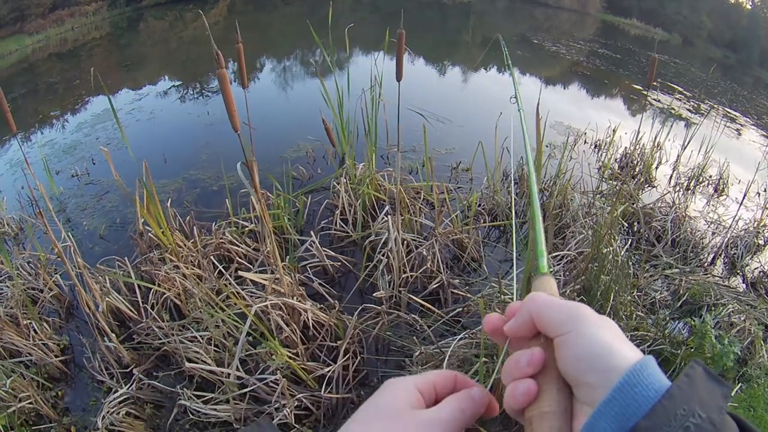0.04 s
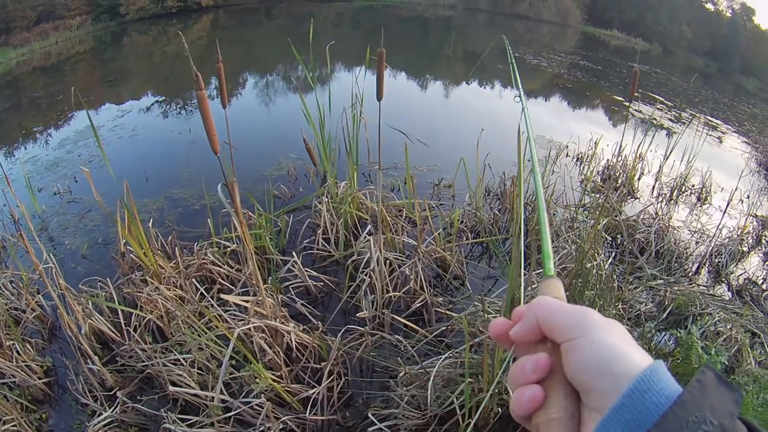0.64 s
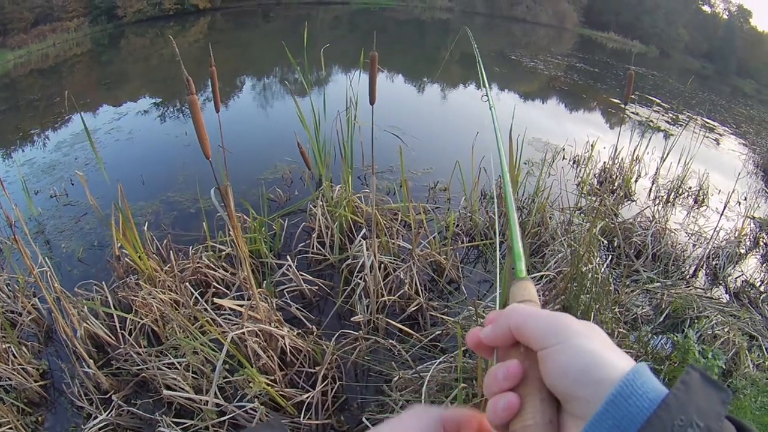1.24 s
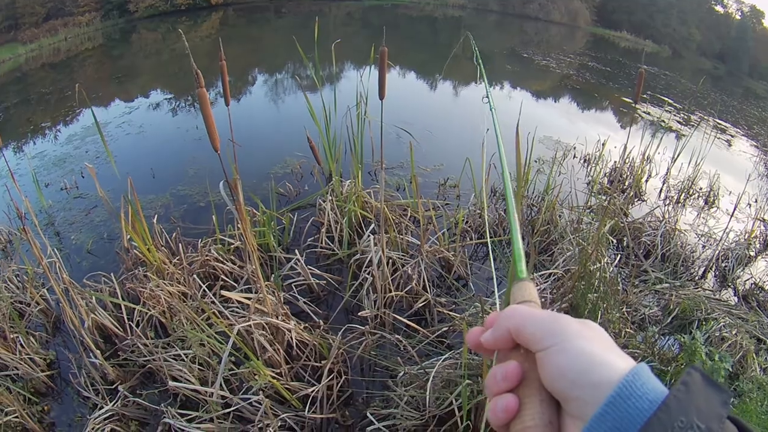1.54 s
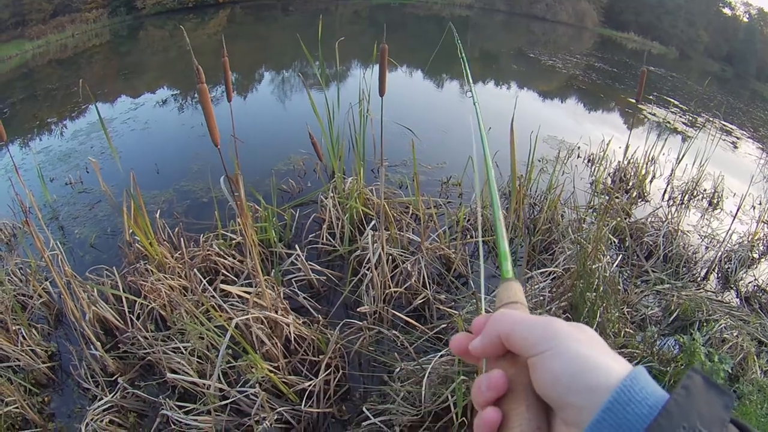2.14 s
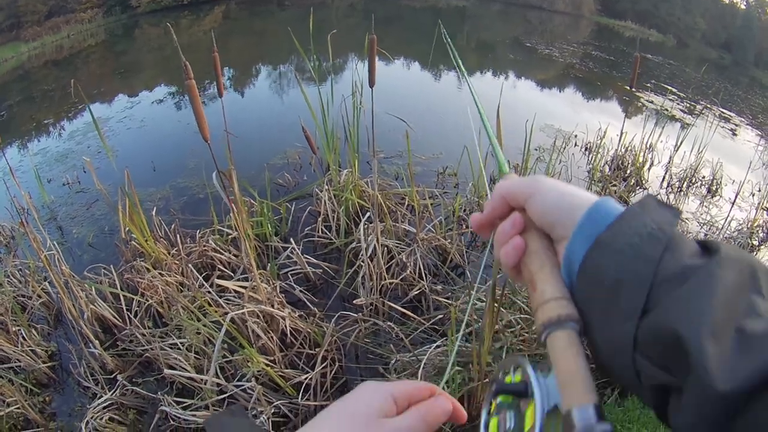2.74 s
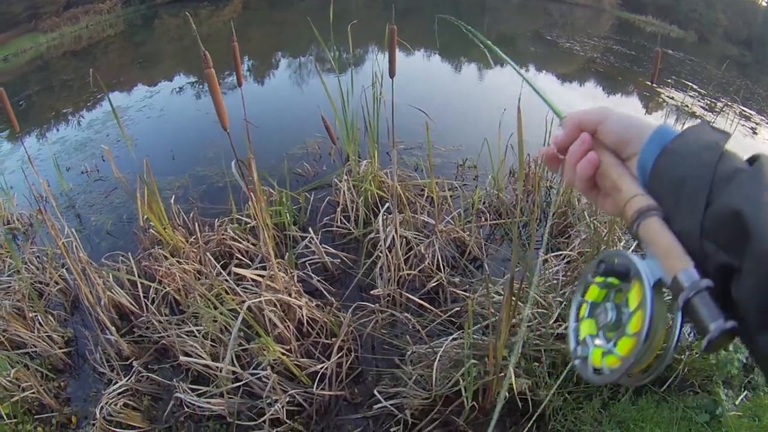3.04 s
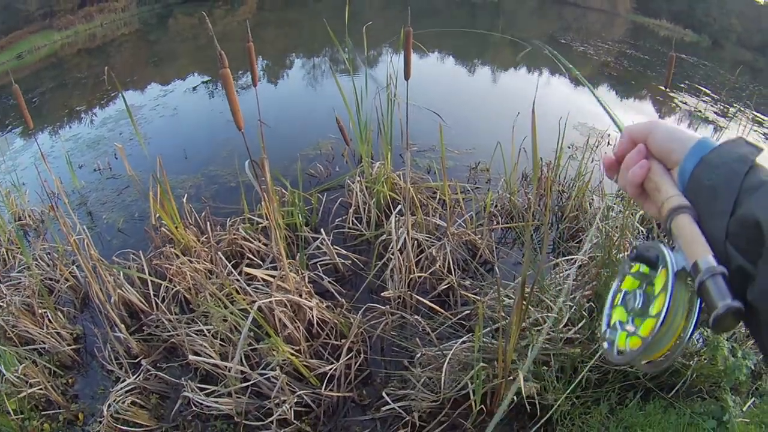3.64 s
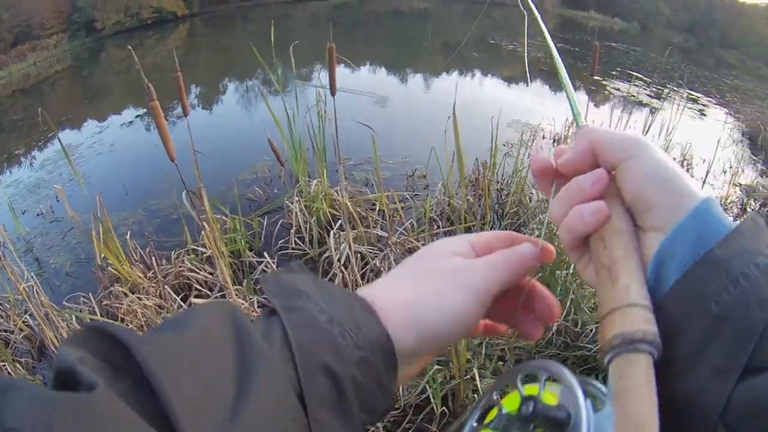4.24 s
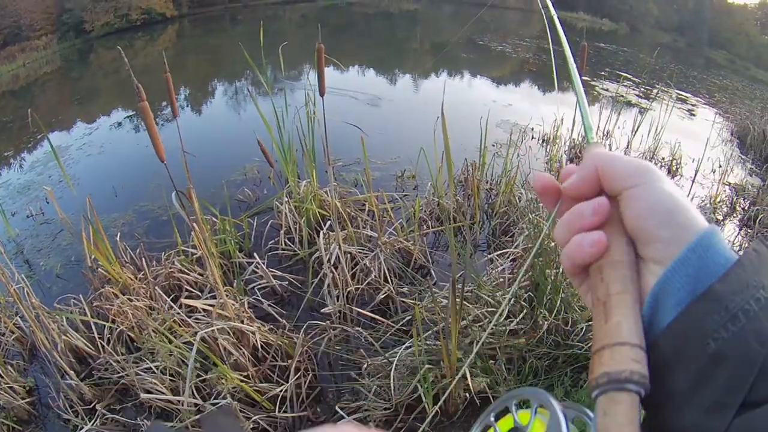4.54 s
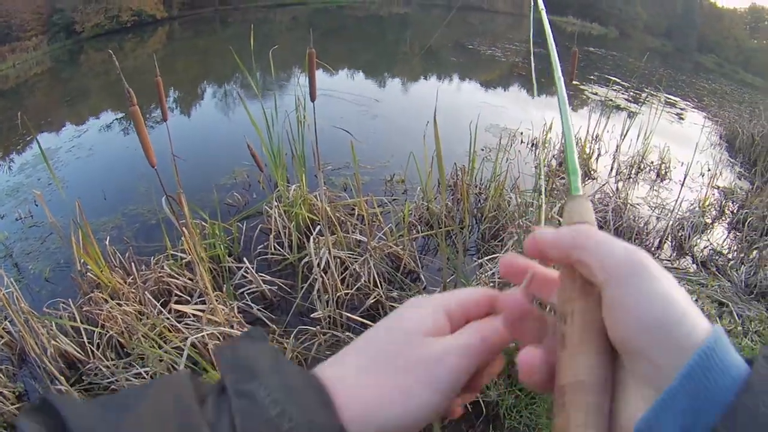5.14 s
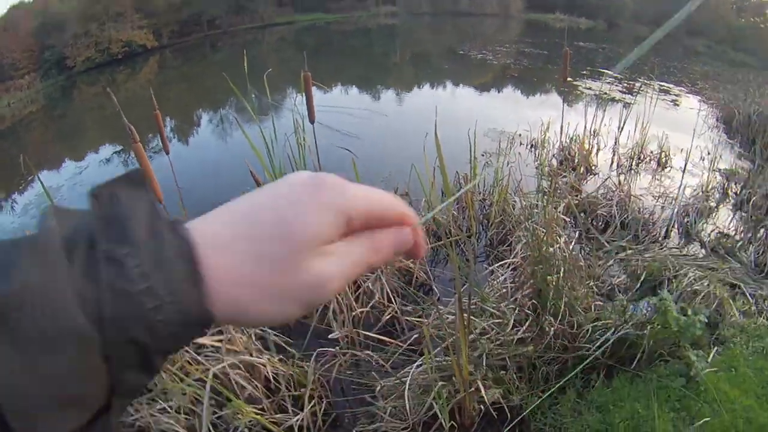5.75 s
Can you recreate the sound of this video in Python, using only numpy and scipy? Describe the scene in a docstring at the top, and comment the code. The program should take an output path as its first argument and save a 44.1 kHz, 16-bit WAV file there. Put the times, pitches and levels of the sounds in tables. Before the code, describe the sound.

Jacket sleeves rustle close by while fishing line hisses through rod rings, with light taps and two flurries of sharp tackle clicks.

```python
"""Jacket sleeves rustle close by as an angler works a fly rod at a quiet pond, heard from the chest.
The weave catches in tiny slips with each arm move; at each pull the line hisses through the rod rings.
Line and fingers tap the rod. Twice the rod arm moves sharply: the jacket creases, tackle clicks in a
flurry and the handle bumps the hand, the second time with a short creak of cloth. Rustle and clicks
come through a microphone that rings near 8 kHz. Underneath lie a faint rumble and a far drone."""
import sys
import numpy as np
from scipy import signal
from scipy.fft import rfft, irfft
from scipy.io import wavfile
from scipy.ndimage import uniform_filter1d

SR = 44100
rng = np.random.default_rng(int(sys.argv[2]) if len(sys.argv) > 2 else 0)


def file_out(sig):
    """Save sig as 16-bit WAV at sys.argv[1]."""
    # one column per channel
    cols = np.atleast_2d(sig).T
    # limit, then scale
    lim = np.clip(cols, -1, 1)
    pcm = np.round(lim * 32767).astype(np.int16)
    wavfile.write(sys.argv[1], SR, pcm)


N = 256124
TIME = np.arange(N) / SR

# arm moves: fastest at t/s, speeding up/s, slowing down/s, crisp rustle/dB, dull rub/dB
ARM_MOVES = [(.01, .05, 0.086, -56, -68.5), (.24, 0.17, .08, -60, -77), (.48, 0.058, 0.098, -49.5, -58.5),
             (.61, 0.21, 0.048, -45, -61), (0.782, 0.08, .04, -46.5, -56.5),
             (0.913, 0.13, 0.059, -45, -56.5), (1.07, 0.1, 0.092, -56.5, -79),
             (1.32, .15, 0.094, -44.5, -57), (1.52, 0.046, 0.063, -46, -60), (1.6, 0.073, 0.086, -50, -60),
             (1.86, 0.14, 0.13, -50.5, -64), (2.12, 0.056, 0.087, -51, -64),
             (2.35, 0.14, 0.13, -48.5, -55.5), (2.55, 0.18, 0.12, -51.5, -59.5),
             (2.94, 0.38, 0.2, -53, -67.5), (3.27, .07, 0.12, -61.5, -73), (3.63, 0.15, 0.22, -50, -62),
             (3.99, 0.1, 0.18, -51, -59.5), (4.077, 0.046, 0.05, -42, -53.5),
             (4.32, 0.11, .11, -46.5, -58.5), (4.55, 0.064, 0.089, -52.5, -67), (4.91, 0.15, .11, -48, -57),
             (5.125, 0.099, 0.088, -42, -51.5), (5.37, .11, .11, -41, -50.5), (5.62, 0.21, 0.17, -56, -64)]
# crisp rustle as heard through the microphone port, which rings near 8 kHz: f/Hz, level/dB
RUSTLE_SPECTRUM = [(1500, -22.5), (2600, -20), (3400, -14), (5000, -14), (6200, -7.5), (7100, -6),
                   (8050, 1.5), (8700, -3), (9400, -6.5), (11000, -13.5), (12200, -14), (13600, -19.5)]
# tone of the dull rub beneath it: f/Hz, level/dB
RUB_SPECTRUM = [(60, 10), (150, 0.5), (300, 2.5), (600, -0.5), (950, -0.5), (1350, -2.5), (2000, -5),
                (3000, -8.5), (5000, -43)]
# line pulls: t/s, speeding up/s, full speed/s, stopping/s, level/dB, rod ring/dB, tilt/(dB per octave)
LINE_PULLS = [(.39, 0.14, 0.12, 0.075, -48, 12, -1.5), (1.131, 0.11, 0.16, 0.024, -45, -2, 1.5),
              (1.775, 0.09, 0.11, 0.039, -44, 18, 0.2), (2.72, .11, 0.09, .13, -51, -5, -.5),
              (3.02, .03, 0.3, 0.013, -66, -1, 3), (3.64, .11, .01, 0.091, -54.5, -16, -2),
              (4.25, .2, 0.2, 0.063, -49, -12, 1.5), (5.38, 0.15, 0.26, 0.16, -52.5, -16, 2.5)]
# tone of the line's hiss: f/Hz, level/dB
LINE_SPECTRUM = [(1500, -18), (2700, -12), (3400, -11), (5100, -5.5), (6000, -2.5), (8000, -0.5),
                 (9000, -5.5), (10200, -11.5), (11200, -33), (14000, -58)]
# rod resonances under the sliding line: f/Hz, width/Hz, level/dB
ROD_RESONANCES = [(3470, 1100, -8.5), (4350, 360, -2), (4750, 180, -0.5), (5870, 670, -9), (6460, 340, 1),
                  (7350, 250, -4), (8100, 500, -17), (8600, 590, -7), (10000, 470, -4)]
# jacket and tackle clicks: t/s, peak/dB, knock/dB re peak, rebound/dB re peak, tilt/(dB per octave)
TACKLE_CLICKS = [(0.1746, -34.5, -16, -28, -4.5), (0.2396, -39.5, -27, -5, 2),
                 (0.2557, -39.5, -24, -25, -1), (1.062, -35.5, -30, -25, 6), (2.269, -21.5, -25, -20, 5),
                 (2.2866, -25, -28, -2, 0.5), (2.3154, -31, -29, -20, 0), (2.3235, -19.5, -21, -20, -0.5),
                 (2.338, -27, -25, -18, 1), (2.3605, -24, -15.5, -14, 1), (2.4397, -24.5, -12, -15, -1),
                 (2.4678, -22, -11, -3.5, 0.5), (2.5342, -26.5, -13, -23, 0.5), (3.0075, -50, -27, -20, 0),
                 (4.1776, -35.5, -28, -11, 2), (4.6871, -35.5, -6, -15, 1), (5.2962, -22, -26, 0, 2),
                 (5.3361, -13.8, -19.5, -22, 4), (5.34, -18.5, -20, -1, 0), (5.3735, -22.5, -25, -24, -2),
                 (5.3781, -23, -6.5, -18, -3), (5.415, -19.5, -15, -26, 1.5)]
# modes of a click at the microphone: multiple of the port's resonance, t60/s, level/dB
CLICK_RESONANCES = [(.33, 0.0012, -10.5), (.68, 0.00093, -7), (.98, 0.0028, 1), (1.05, 0.0022, 2),
                    (1.2, 0.0014, -2), (1.35, 0.0012, -5), (1.65, 0.002, -14.5)]
# the handle bumps the hand: t/s, peak/dB
HANDLE_BUMPS = [(2.4649, -26.5), (5.3782, -20.5)]
# modes of a bump, the lowest coming late: f/Hz, t60/s, level/dB, lag/s
HANDLE_MODES = [(99, 0.063, -6, .008), (225, 0.013, -2.5, 0.0011), (369, 0.033, 0, .001),
                (800, 0.011, -4.5, 0.002125), (1450, 0.0088, 0, 0.002004)]
# light taps on the rod: t/s, peak/dB, f/Hz
ROD_TAPS = [(.1743, -36.5, 560), (.528, -44, 1140), (.604, -43, 1250), (.631, -39, 1350), (.751, -42, 1880),
            (.842, -45, 290), (.884, -41, 536), (1.384, -38, 1280), (2.4402, -36, 905), (2.4579, -37, 450),
            (3.75, -44.5, 1100), (3.985, -43, 1100), (4.034, -41, 800), (4.676, -34.5, 1160),
            (4.834, -31, 1350), (5.276, -43, 1900), (5.524, -41, 1000), (5.573, -40, 1180)]
# the jacket creases: t/s, folding/s, held/s, relaxing/s, level/dB
JACKET_FOLDS = [(2.23, 0.094, 0.022, .03, -45), (5.28, 0.049, 0.064, 0.087, -43)]
# tone of the outdoor rumble and hiss: f/Hz, level/dB
AIR_SPECTRUM = [(20, -0.5), (36, -1.5), (52, 0.5), (75, -7.5), (110, -8), (200, -11.5), (300, -16.5),
                (450, -22), (1200, -24.5), (2500, -34), (5400, -34), (8000, -34), (10000, -33.5),
                (14000, -39)]
# tone of the far drone, perhaps traffic: f/Hz, level/dB
DRONE_SPECTRUM = [(70, -21), (125, -13.5), (152, 0.5), (185, -10), (400, -28)]
# swell of that drone: t/s, level/dB
DRONE_SWELL = [(0, -78), (1.2, -70), (1.9, -62), (3.1, -72.5), (4.3, -58.5), (5.8, -60)]


def sleeves(rest_db=-75):
    """The weave catches in countless small slips over a dull rub; both swell with each arm move."""
    crisp_power, rub_power = undb(rest_db) ** 2, 0  # the jacket is never quite still
    for s, rise, fall, crisp_db, rub_db in ARM_MOVES:
        speed = swing(s, rise, fall)
        crisp_power += (speed * undb(crisp_db)) ** 2
        rub_power += (speed * undb(rub_db)) ** 2
    crisp = colour(grains(per_s=9000, spread_db=-1.5), RUSTLE_SPECTRUM) * undb(0.96 * walk(70))
    rub = colour(grains(per_s=3000, spread_db=1.4), RUB_SPECTRUM) * undb(2.3 * walk(50))
    return crisp * np.sqrt(crisp_power) + rub * np.sqrt(rub_power)


def line():
    """The line slides through the rings and sets the rod hissing; its speed wavers."""
    out = np.zeros(N)
    for start, attack, hold, release, level_db, ring_db, tilt_db in LINE_PULLS:
        friction = [(hz, db + tilt_db * np.log2(hz)) for hz, db in LINE_SPECTRUM]
        rod = [(hz, width, db + ring_db) for hz, width, db in ROD_RESONANCES]
        hiss = colour(grains(per_s=16000, spread_db=1.0), friction, rod)
        out += hiss * undb(level_db) * stroke(start, attack, hold, release)
    return out * undb(0.69 * walk(80))


def clicks(mic_port_hz=8070, rebound_s=.0032, chatter_s=0.0021, chatter_db=-22):
    """Each hard contact chatters, rings the microphone port, knocks the body behind it and rebounds."""
    out, t = np.zeros(N), TIME[:SR // 50]
    knock = crest(ring(hz=400, t60=0.0067))
    for s, db, knock_db, rebound_db, tilt_db in TACKLE_CLICKS:
        # harder hits tilt brighter; neighbouring modes start in opposite polarity
        modes = sum((-1) ** k * undb(mode_db + tilt_db * np.log2(ratio)) * ring(mic_port_hz * ratio, t60)
                    for k, (ratio, t60, mode_db) in enumerate(CLICK_RESONANCES))
        for lag, peak_db in (0, db), (rebound_s, db + rebound_db):
            chatter = undb(chatter_db) * rng.standard_normal(len(t)) * np.exp(-t / chatter_s)
            click = crest(signal.fftconvolve(modes, (t == 0) + chatter))
            add(out, s + lag, undb(peak_db) * click)
        add(out, s, undb(db + knock_db) * knock)
    return out


def bumps():
    """The handle lands in the hand: a hollow knock, then a low thud."""
    out = np.zeros(N)
    for s, db in HANDLE_BUMPS:
        bump = np.zeros(N)
        for hz, t60, mode_db, lag in HANDLE_MODES:
            add(bump, s + lag, undb(mode_db) * soft_contact(hz, t60))
        out += undb(db) * crest(bump)
    return out


def taps():
    """Line and fingers touch the rod lightly, each time at another spot."""
    out = np.zeros(N)
    for s, db, hz in ROD_TAPS:
        add(out, s, undb(db) * soft_contact(hz, t60=0.0077))
    return out


def creases():
    """Folding cloth buckles in sparse little cracks."""
    folding = sum(undb(db) * stroke(*timing) for *timing, db in JACKET_FOLDS)
    return colour(grains(per_s=700, spread_db=5.0), RUSTLE_SPECTRUM) * folding


def creak(start_s=5.337, length_s=.027, fade_s=0.0041, level_db=-41.5, jitter=0.029):
    """Cloth sticks and slips faster and faster; each slip nudges a damped body."""
    slip_hz = np.interp(TIME - start_s, [0, length_s], [297, 412])
    cycles = np.cumsum(slip_hz * (1 + jitter * walk(300))) / SR
    slips = np.diff(np.floor(cycles), prepend=0)
    body = unit(signal.fftconvolve(slips - slips.mean(), ring(hz=420, t60=0.0042))[:N])
    return body * undb(level_db) * stroke(start_s - fade_s, fade_s, length_s, fade_s)


def pond(air_db=-56.5):
    """A bed of faint outdoor rumble and even hiss, with a far drone that comes and goes."""
    air = colour(rng.standard_normal(N), AIR_SPECTRUM) * undb(air_db + 0.2 * walk(2.33))
    drone_db = np.interp(TIME, *np.transpose(DRONE_SWELL))
    drone = colour(rng.standard_normal(N), DRONE_SPECTRUM) * undb(drone_db)
    return air + drone


def swing(s, rise, fall, drop_db=9, roundness=2.1):
    """Envelope of an arm move: a rounded swell about its fastest moment."""
    away = np.maximum((s - TIME) / rise, (TIME - s) / fall)
    return undb(-drop_db * np.abs(away) ** roundness)


def stroke(start, attack, hold, release):
    """Envelope of one movement: it speeds up evenly, holds and stops."""
    rising = (TIME - start) / attack
    falling = 1 - (TIME - start - attack - hold) / release
    return np.clip(np.minimum(rising, falling), 0, 1)


def soft_contact(hz, t60, scuff_s=0.0016, scuff_db=-23):
    """One damped resonance, roughened by a short scuff; peak 1."""
    t = TIME[:SR // 50]
    scuff = undb(scuff_db) * rng.standard_normal(len(t)) * np.exp(-t / scuff_s)
    return crest(signal.fftconvolve(ring(hz, t60), (t == 0) + scuff))


def ring(hz, t60):
    """One struck mode, dying by 60 dB in t60 seconds."""
    t = TIME[:SR // 10]
    return np.sin(2 * np.pi * hz * t) * np.exp(-np.log(1000) * t / t60)


def grains(per_s, spread_db):
    """Tiny slips of uneven strength at random moments; rms 1."""
    size = undb(spread_db * np.minimum(rng.exponential(size=N), 6))
    return unit((rng.random(N) < per_s / SR) * size * rng.standard_normal(N))


def colour(x, points, resonances=()):
    """EQ a sound with a smooth curve and resonant peaks on top; rms 1."""
    f = np.arange(N // 2 + 1) * SR / N + 1e-3
    hz, db = np.transpose(sorted(points))
    gain = undb(np.interp(np.log(f), np.log(hz), db))
    peaks = sum(undb(d) / (1 + (2 * (f - centre) / width) ** 2) for centre, width, d in resonances)
    return unit(irfft(rfft(x) * gain * (1 + peaks), N))


def walk(rate):
    """Smooth drift: random levels held 1 / rate s and slewed twice; rms 1."""
    hold = int(SR / rate)
    steps = np.repeat(rng.standard_normal(N // hold + 1), hold)
    return unit(uniform_filter1d(uniform_filter1d(steps, hold), hold)[:N])


def undb(db):
    """Decibels to gain."""
    return 10 ** (np.asarray(db) / 20)


def unit(x):
    """Scale to rms 1."""
    return x / np.sqrt(np.mean(x ** 2))


def crest(x):
    """Scale to peak 1."""
    return x / np.max(np.abs(x))


def add(out, s, sound):
    """Mix a sound in at s seconds."""
    i = int(s * SR)
    out[i:i + len(sound)] += sound[:N - i]


def scene():
    """The angler, close and dry, over the open-air bed; mono."""
    return (sleeves() + creases() + line() + clicks() + taps() + bumps() + creak() + pond())[None]


def record(dry, top_hz=14000):
    """A steep low-pass removes the highs above 14 kHz."""
    return signal.sosfilt(signal.ellip(8, .2, 70, top_hz, fs=SR, output="sos"), dry)


dry = scene()
out = record(dry)
file_out(out)
```